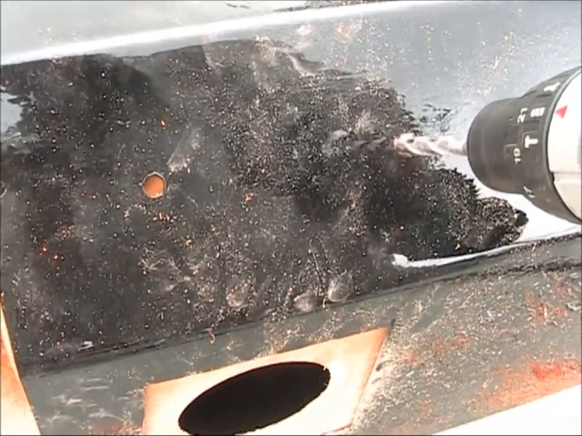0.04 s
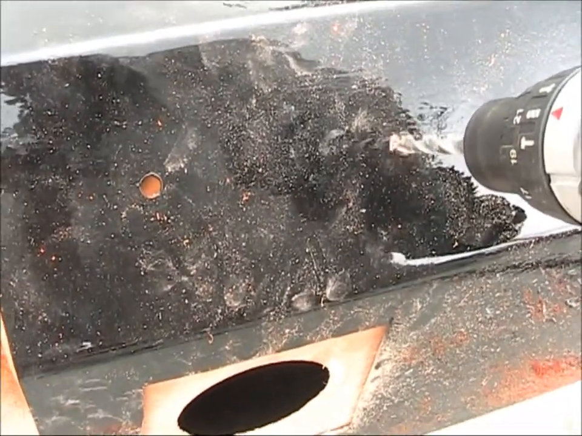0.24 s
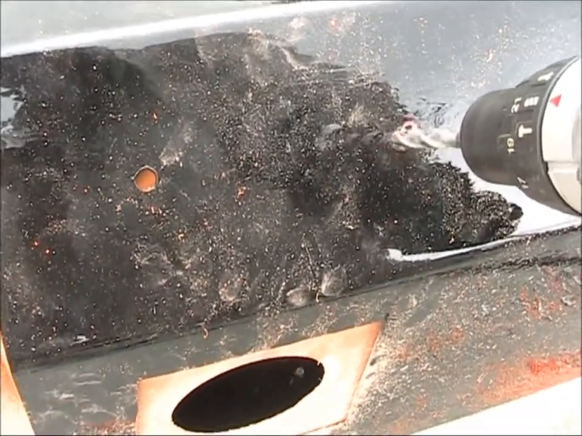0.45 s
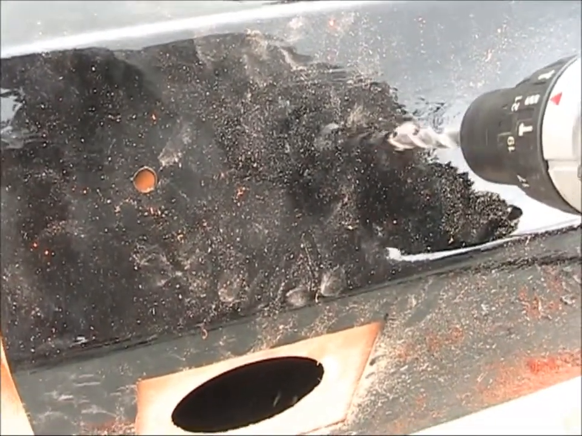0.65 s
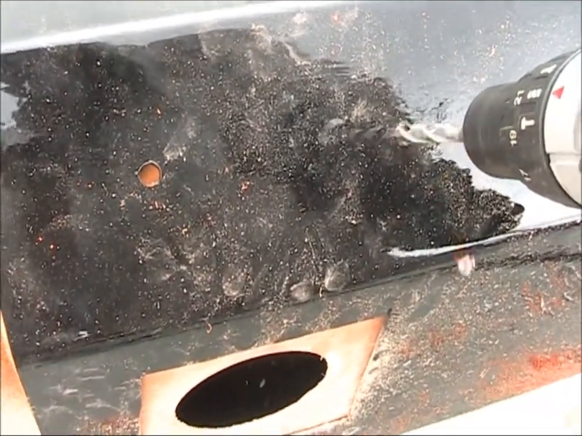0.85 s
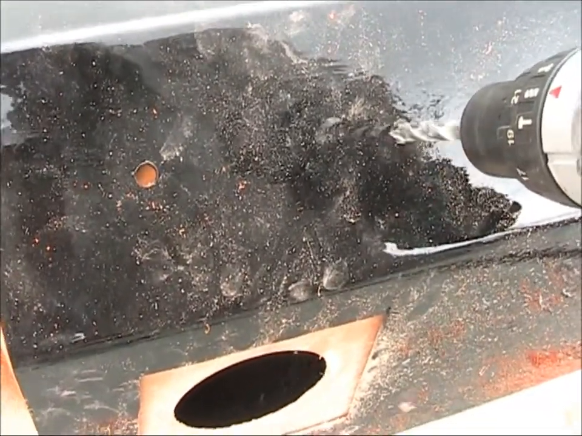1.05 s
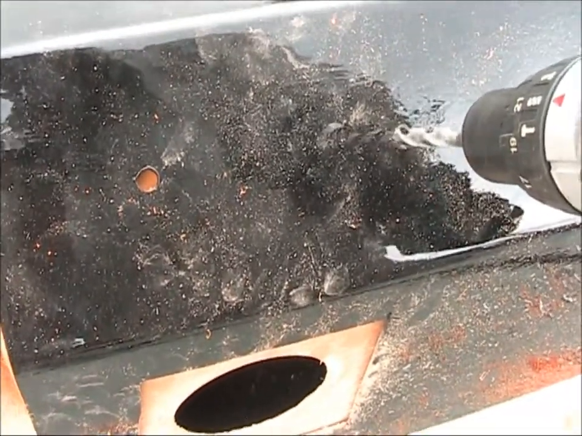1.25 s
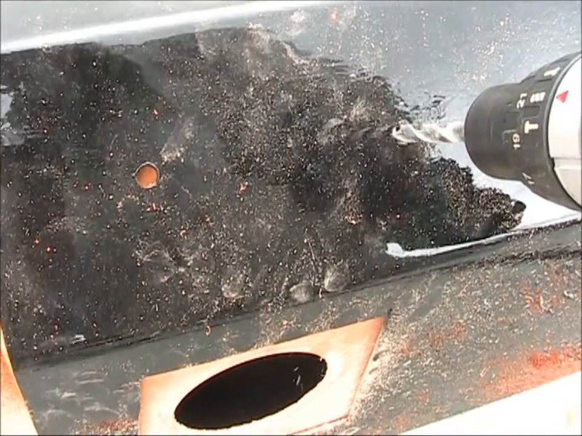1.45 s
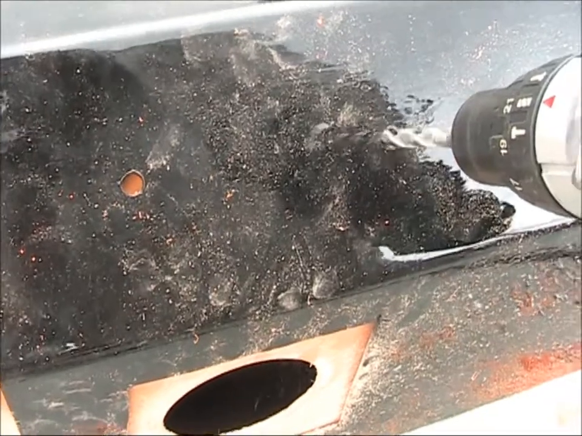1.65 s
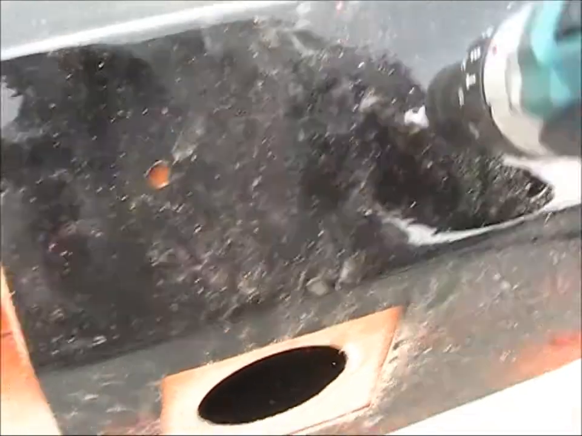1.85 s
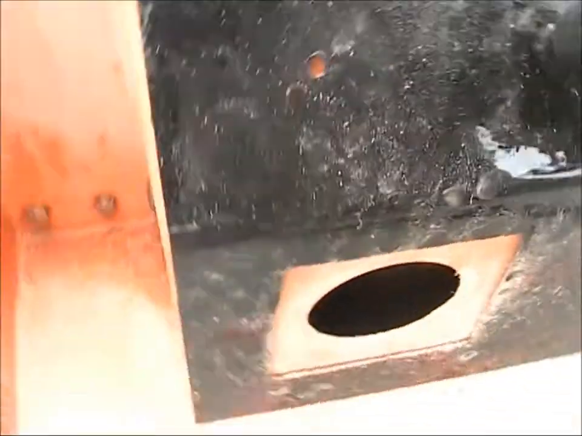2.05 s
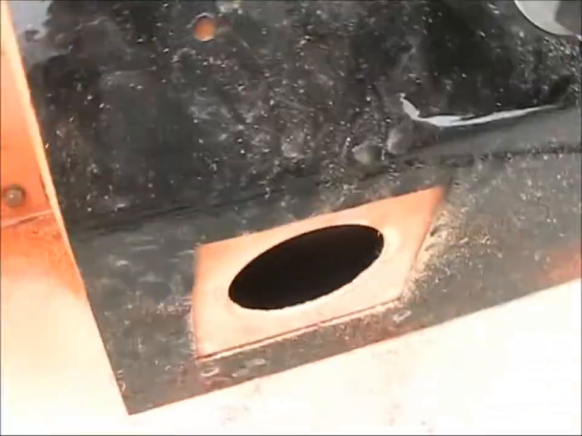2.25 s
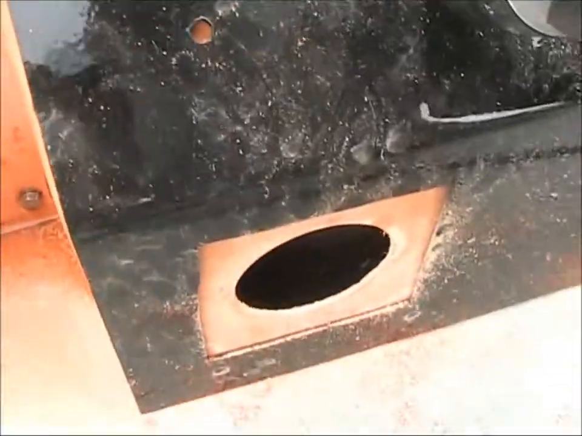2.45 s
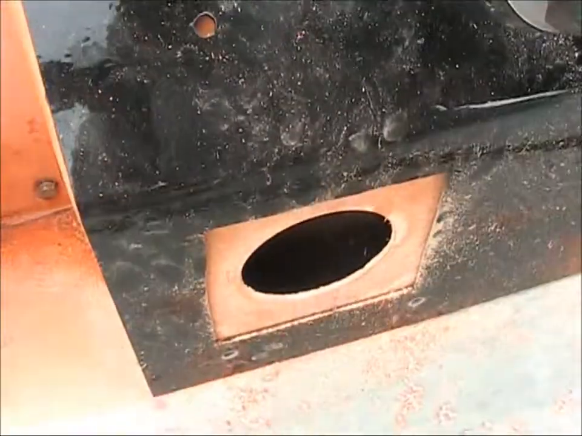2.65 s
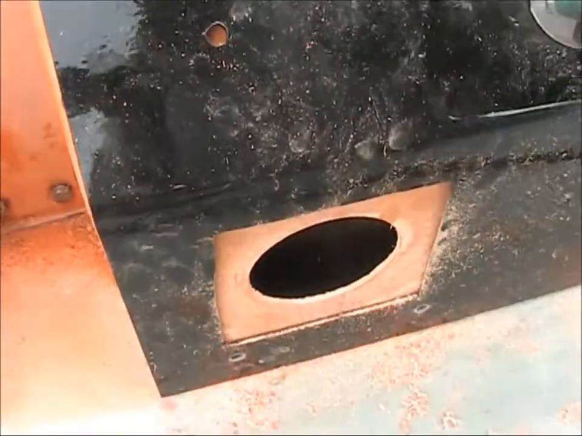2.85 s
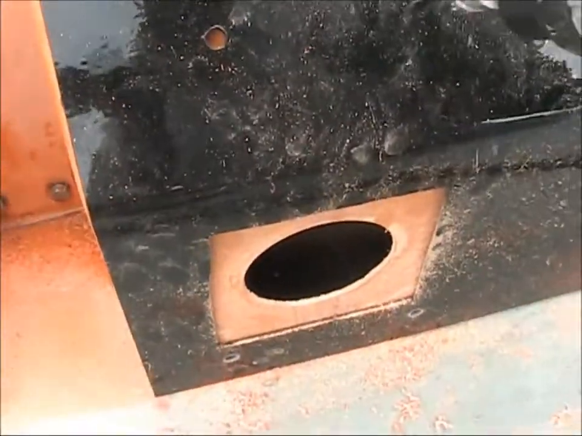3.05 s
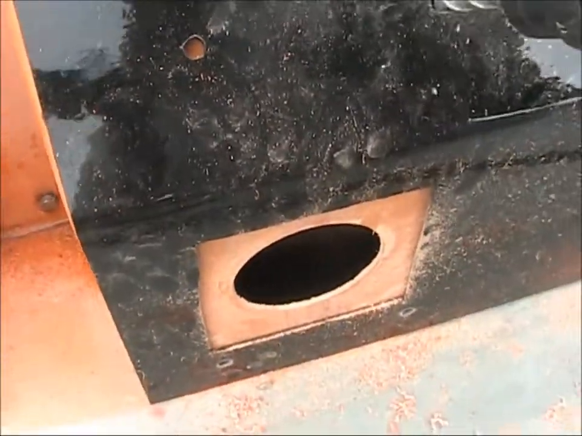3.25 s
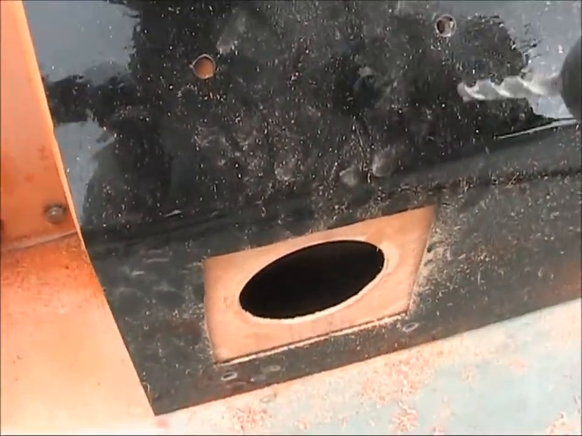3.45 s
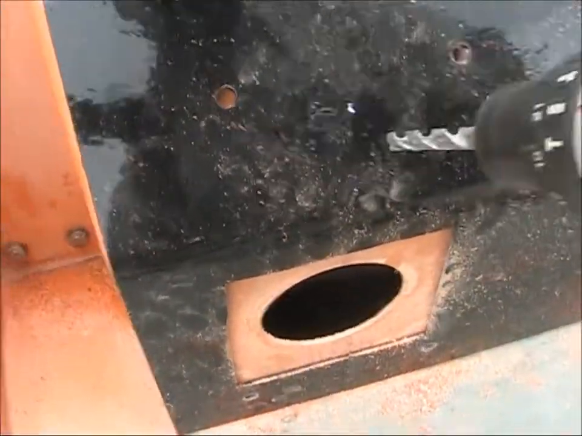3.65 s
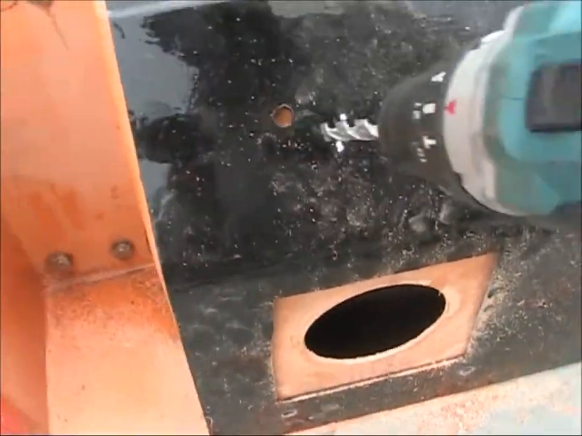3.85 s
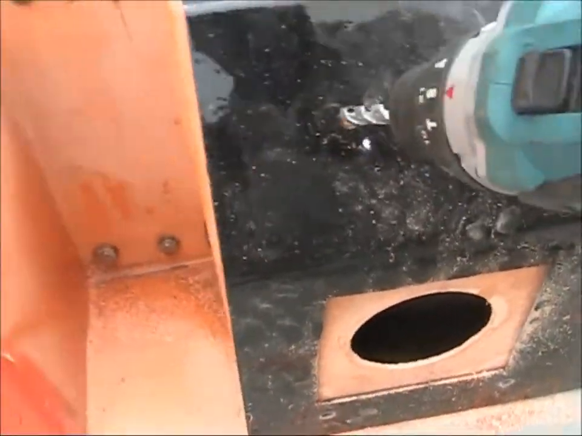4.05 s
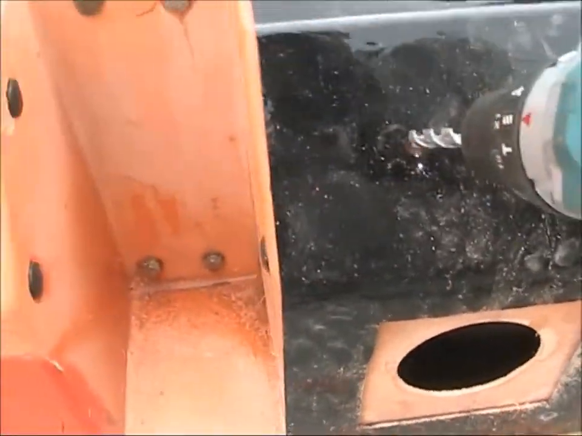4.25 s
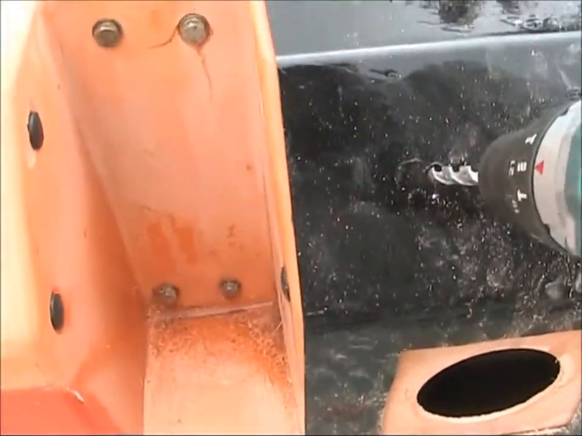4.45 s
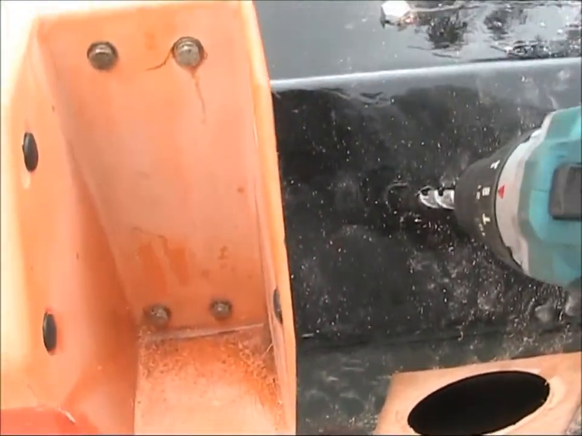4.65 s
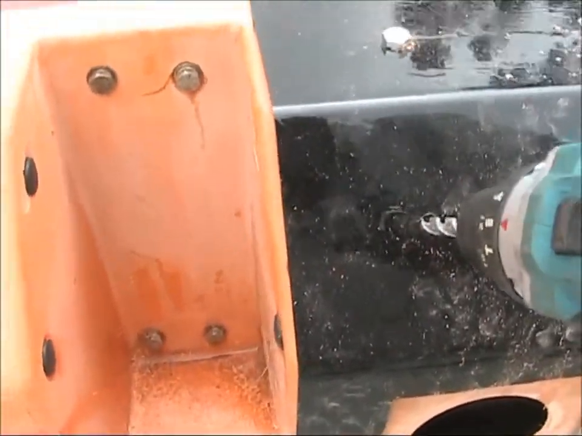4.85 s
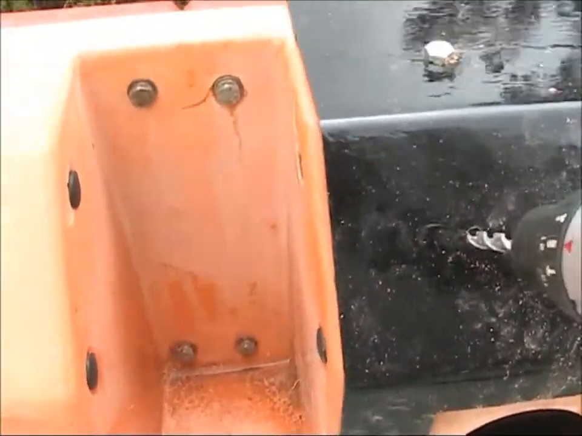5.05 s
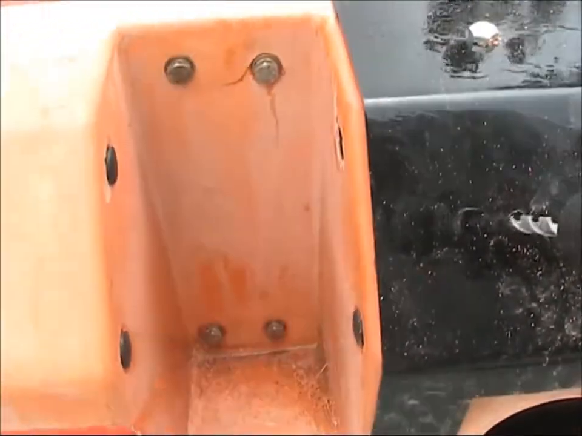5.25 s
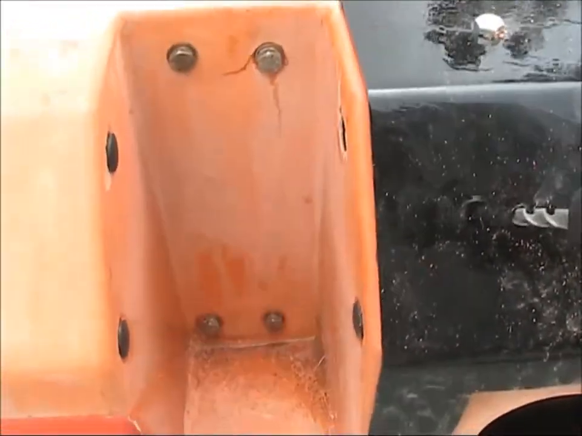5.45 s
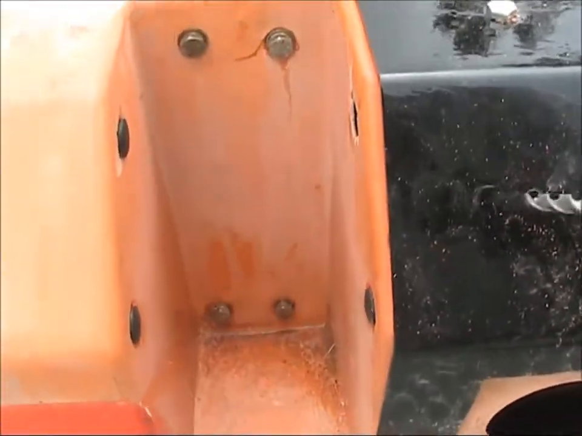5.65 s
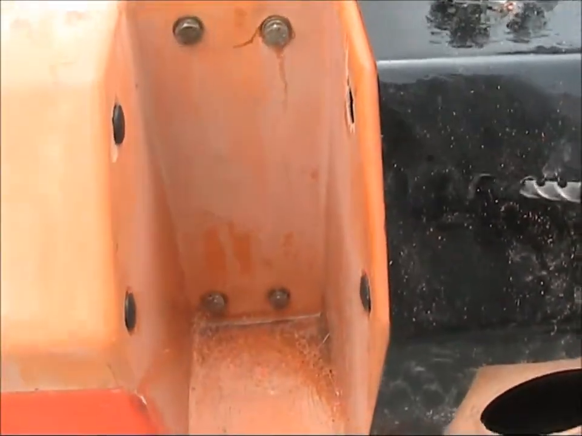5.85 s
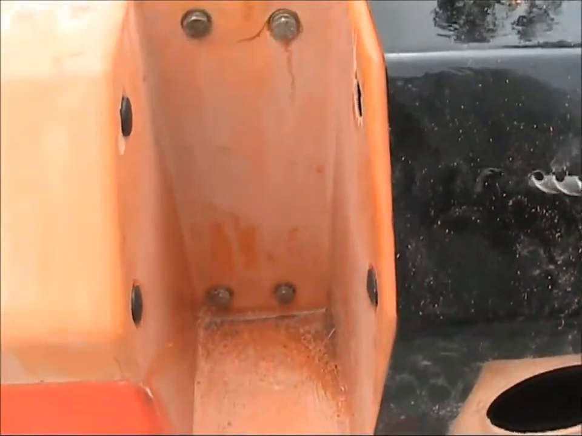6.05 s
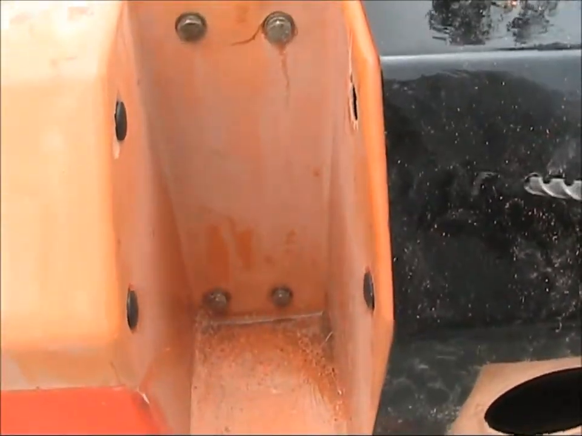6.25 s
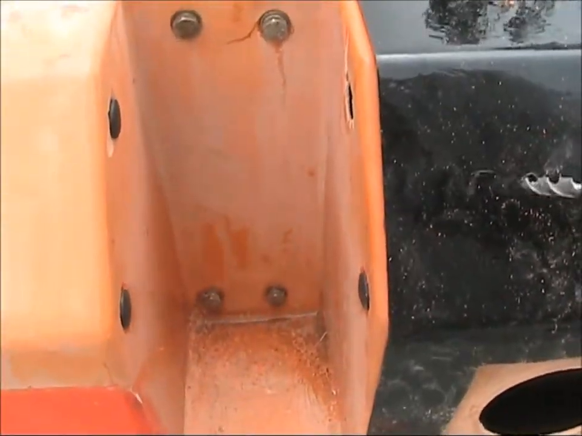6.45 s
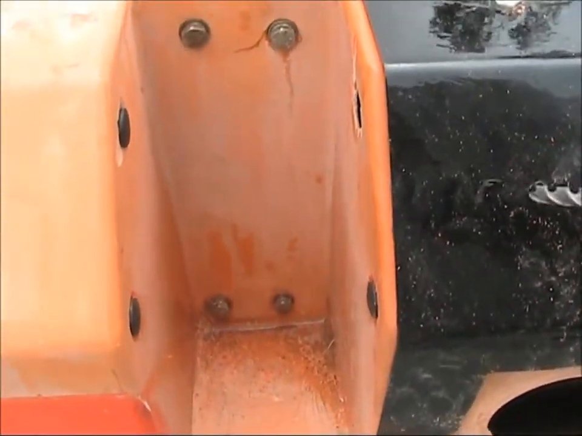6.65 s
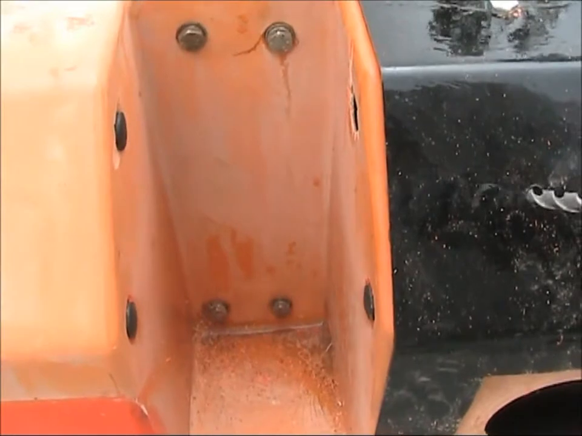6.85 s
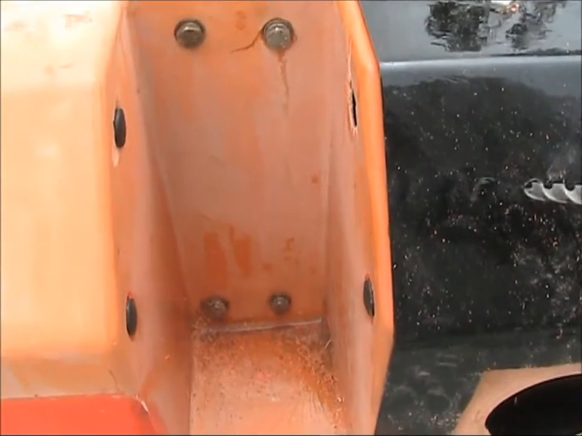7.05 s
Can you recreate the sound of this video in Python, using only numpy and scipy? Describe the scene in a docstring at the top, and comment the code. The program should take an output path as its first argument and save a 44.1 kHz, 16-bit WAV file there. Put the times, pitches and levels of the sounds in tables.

```python
"""Drilling a fibreglass boat panel

A cordless drill bores close to a hand-held camera, stops, is dragged to a new spot and starts again. Sine
rotor orders whine over noisy gear clatter; noise and blows ring the panel's modes as drumming and knocks.
Rough contact bursts make the trigger ticks and ring the dragged drill body. Coloured noise makes the wind
on two microphone ports and a faint outdoor hiss; a wavering sine makes one far chirp."""
import sys
import numpy as np
from scipy import signal
from scipy.fft import rfft, irfft
from scipy.io import wavfile
from scipy.ndimage import uniform_filter1d, map_coordinates

SR = 44100
rng = np.random.default_rng(int(sys.argv[2]) if len(sys.argv) > 2 else 0)


def put_to_file(sound):
    """Save the sound as 16-bit audio at rate SR, in the file named by the first command-line argument."""
    columns = np.atleast_2d(sound).T  # one column per channel
    safe = np.clip(columns, -1, 1)
    whole_steps = np.round(safe * 32767)
    wavfile.write(sys.argv[1], SR, whole_steps.astype(np.int16))


N = 313110
T = np.arange(N) / SR
SWUNG_ASIDE_S, SECOND_HOLE_S = 1.85, 4.4  # the drill is swung aside; settings for the second hole begin
SQUEEZE_S = 5.176  # the rotor starts to turn again
HUM_DB_PER_OCTAVE = 48  # an unbalanced rotor shakes less as it slows

# colour of the gearbox shell: pitch_hz [Hz], level_db [dB per Hz, relative]
SHELL = [(300, -11.5), (600, -14), (1200, -6), (1650, -5.5), (2000, -4.5), (2300, -1.5), (2900, -3.5),
         (4300, 3), (5300, -2), (6500, -2.5), (8500, -0.5), (10000, -3.5), (11500, -5.5), (13000, -12),
         (14500, -12), (15700, -46)]
# panel modes: pitch_hz [Hz], level_db [dB], t60_s [s, before each use shortens it]
PANEL_MODES = [(157, -9, 0.32), (178, -5.5, 0.21), (260, 4.5, 0.071), (362, -1.5, 0.092),
               (550, -9.5, 0.047), (686, -0.5, 0.07), (803, 3, 0.073), (897, -8.5, 0.15),
               (1105, 7.5, 0.044), (1296, 7.5, 0.054), (1400, -3, 0.05), (1684, 6.5, 0.058),
               (2290, 6, 0.04), (3470, -24.5, .03)]
# modes of the drill body dragged on the panel: pitch_hz [Hz], width_hz [Hz], level_db [dB]
BODY_MODES = [(168, 47, 20), (523, 13, -2.5), (670, 35, -5), (790, 37, -11), (926, 19, -11),
              (1054, 10, -5.5), (1132, 18, -10), (1240, 12, -12), (1464, 45, -7), (1717, 44, -9),
              (2004, 50, -22), (3070, 68, -17), (3420, 150, -13), (3890, 53, -9), (4450, 32, -14),
              (4970, 41, -36), (5570, 32, -24), (7900, 30, -24), (8800, 30, -25.5)]


def undb(db):
    """Turn decibels into an amplitude factor."""
    return 10 ** (np.asarray(db) / 20)


def unit(x):
    """Scale to rms 1."""
    return x / np.sqrt(np.mean(x ** 2))


def follow(points):
    """Draw each level or pitch column of a timed table as a curve over the whole scene."""
    s, *columns = np.transpose(points)
    return [np.interp(T, s, column) for column in columns]


def colour(x, points):
    """Shape a spectrum by (Hz, dB) points joined on a log pitch scale; rms 1."""
    hz, db = np.transpose(points)
    f = np.arange(N // 2 + 1) * SR / N + 1  # 1 Hz up keeps the log finite
    gain = undb(np.interp(np.log(f), np.log(hz), db, left=-70))
    return unit(irfft(rfft(x) * gain, N))


def walk(rate):
    """Smooth random wander with rms 1, from noise stepped at this rate (Hz)."""
    k = int(SR / rate)
    steps = np.repeat(rng.standard_normal(N // k + 1), k)
    return unit(uniform_filter1d(uniform_filter1d(steps, k), k)[:N])


def ring(x, hz, t60):
    """One resonant mode driven by x, decaying 60 dB in t60 seconds."""
    pole = np.exp(2j * np.pi * hz / SR - np.log(1000) / (t60 * SR))
    return signal.lfilter([1], [1, -pole], x).imag


def passed(x, order, hz, kind="low"):
    """Butterworth filter."""
    return signal.lfilter(*signal.butter(order, hz, kind, fs=SR), x)


def passed_in_phase(x, order, hz, kind="low"):
    """Butterworth filter run both ways, so that it adds no delay."""
    return signal.sosfiltfilt(signal.butter(order, hz, kind, fs=SR, output="sos"), x)


def add(out, s, sound, peak_db):
    """Mix a sound in at time s with the given peak."""
    i = int(s * SR)
    out[i:i + len(sound)] += (sound * undb(peak_db) / np.abs(sound).max())[:N - i]


def burst(ms, size=12000):
    """Rough contact force dying by 1 / e in this many ms."""
    return rng.standard_normal(size) * np.exp(-np.arange(size) / (ms * SR / 1000))


def near(hz, spot_hz, octaves):
    """A struck spot drives the modes near its pitch most."""
    return np.exp(-.5 * (np.log2(hz / spot_hz) / octaves) ** 2)


def spin():
    """Share of full speed: braked when the trigger is let go, running up when it is pulled."""
    release_s, brake_s, spin_up_s = 3.503, .056, .098  # the brake takes the speed down by 1 / e in brake_s
    braking = np.exp(-np.maximum(T - release_s, 0) / brake_s)
    braking = uniform_filter1d(braking, size=400)
    run_up = np.tanh((T - SQUEEZE_S) / spin_up_s)
    return np.maximum(braking, run_up) + 1e-4


def gear_clatter(angle, strain):
    """Noisy tooth impacts pulse once a turn and take on the colour of the gearbox shell."""
    strained_rattle_db = -1  # teeth pressed together rattle less
    teeth = rng.standard_normal(N) * undb(1.34 * rng.exponential(size=N))
    teeth *= 1 + 0.11 * np.cos(angle)
    wander_db = 0.6 * walk(12) + 1.2 * walk(150)
    return colour(teeth, SHELL) * undb(wander_db + strained_rattle_db * strain)


def rotor_orders(angle, hz, strain, upper_db):
    """Multiples of the rotor speed share one shaft angle and swell as they cross the shell's resonances."""
    full_speed_hz, upper_order = 380, 20  # reference speed; the upper orders start here
    # rotor orders against the clatter: multiple [-], first_hole_db, swung_aside_db, second_hole_db [dB]
    orders = [(2, -18, -18, -20), (3, -26, -28, -29), (4, -25, -25, -36), (6, -30, -33, -30),
              (7, -25, -22, -32), (8, -18, -23, -19), (9, -14, -18, -20), (11, -28, -20, -27),
              (12, -30, -22, -28), (13, -32, -24, -23), (14, -20, -15, -18), (15, -26, -23, -26),
              (16, -25, -21, -25), (17, -30, -23, -28), (18, -32, -22, -21), (19, -23, -22, -22),
              (20, -18, -14, -8), (21, -21, -17, -20), (22, -30, -20, -12), (23, -9, -10, -17),
              (24, -16, -15, -9), (25, -17, -23, -26), (26, -19, -24, -17), (28, -24, -27, -18),
              (29, -21, -24, -17), (30, -11, -20, -12)]
    # orders that sing out off full speed: multiple [-], level_db [dB against the clatter, before the shell]
    strained_orders = [(4.9, -12), (12, -15), (14, -15), (20, -12), (23, -12), (25, -13), (28, -11),
                       (35, -9)]
    shell_hz, shell_db = np.transpose(SHELL)
    octaves = np.log2(hz / full_speed_hz)
    out = np.zeros(N)
    for k, first, aside, second in orders:
        db = np.select([T < SWUNG_ASIDE_S, T < SECOND_HOLE_S], [first, aside], second) + 1.8 * walk(14)
        if k >= upper_order:
            db = db + upper_db
        # slower teeth strike softer; the shaking of the lowest orders dies faster
        db = db + (HUM_DB_PER_OCTAVE / 2 if k < 3 else 2.5) * octaves
        db = db + np.interp(k * hz, shell_hz, shell_db) - np.interp(k * full_speed_hz, shell_hz, shell_db)
        out += undb(db) * np.sqrt(2) * np.sin(k * angle + k * k)
    for k, db in strained_orders:
        level_db = db + 4 * walk(60) + np.interp(k * hz, shell_hz, shell_db)
        out += strain * undb(level_db) * np.sqrt(2) * np.cos(k * angle + k * k)
    return out


def drill(hz, strain, clatter_db, whine_db, hum_db, upper_db):
    """Clatter, orders, pinion whine and rotor hum all turn on one wavering shaft angle."""
    wavering_hz = hz * (1 + 0.00084 * walk(40) + 0.000497 * walk(10))
    angle = 2 * np.pi * np.cumsum(wavering_hz) / SR
    clatter = gear_clatter(angle, strain) + rotor_orders(angle, hz, strain, upper_db)
    whine = undb(whine_db + 0.38 * walk(30)) * np.sin(10 * angle)  # ten teeth on the pinion
    whine *= np.clip((hz - 170) / 130, 0, 1)  # lost at low speed
    hum = undb(hum_db + 0.94 * walk(26)) * np.sin(angle)
    return undb(clatter_db) * clatter + np.sqrt(2) * (whine + hum)


def vents(clatter_db):
    """The vents blow shell-coloured noise, unrelated at the two ports, that follows the clatter level."""
    share = .55  # of the clatter amplitude
    air = np.array([colour(rng.standard_normal(N), SHELL) for _ in range(2)])
    return undb(clatter_db) * share * air


def bites(hz):
    """In the second hole the bit bites once a chuck turn, each bite dying away to a resting level."""
    turns_per_bite, bite_s = 30.4, 5.995  # rotor turns; time of one bite
    rest, fade = .22, .35  # level between bites; share of a chuck turn in which a bite dies by 1 / e
    chuck = np.cumsum(hz) / SR / turns_per_bite
    since = (chuck - chuck[int(bite_s * SR)]) % 1
    return np.where(T > SECOND_HOLE_S, rest + np.exp(-since / fade), 1)


def drumming(drum_db):
    """Noisy chip cutting keeps the panel modes humming, the low ones most."""
    first_hole_boom_db = 4  # the first hole sits where the lowest modes swing widest
    chips = rng.standard_normal(N) * undb(1.2 * walk(30))
    hum = np.zeros(N)
    for hz, db, t60 in PANEL_MODES:
        boom_db = (hz < 200) * (T < SWUNG_ASIDE_S) * first_hole_boom_db
        hum += undb(db + boom_db) * near(hz, 285.0, 2.75) * ring(chips, hz, .5 * t60)
    return undb(drum_db) * unit(hum)


def wind():
    """Gusts of low noise buffet the ports, the left one most, pushing them partly oppositely."""
    # gust level: start_s [s], buffeting_db [dB, before each port's own level]
    gusts = [(0.0, -33), (0.95, -38), (1.36, -46), (1.66, -40), (1.8, -40), (2.16, -45), (2.27, -36),
             (2.37, -51), (2.61, -55), (2.91, -43), (3.16, -50), (3.24, -43), (3.38, -57), (3.62, -66),
             (3.68, -60), (3.75, -49), (3.85, -51), (3.93, -44), (4.21, -34.5), (4.28, -44), (4.39, -36.5),
             (4.43, -41), (4.5, -27), (4.65, -33.5), (4.8, -31), (4.92, -32), (5.12, -39), (5.26, -34),
             (5.63, -46.5), (6.03, -50), (6.19, -50), (6.76, -51), (7.0, -50)]
    # rumble colour: pitch_hz [Hz], level_db [dB per Hz, relative]
    rumble = [(12, -59.5), (20, -3.5), (59, -11.5), (119, -6.5), (313, -24), (404, -59), (468, -35),
              (700, -55), (910, -71), (1540, -120)]
    gust = undb(follow(gusts)[0])
    swell = walk(14)
    shared = rng.standard_normal(N)
    ports = []
    for port_db, mix in ((5.5, 1.12), (-3.0, -0.61)):  # left, right
        push = colour(rng.standard_normal(N) + mix * shared, rumble)
        ports.append(gust * undb(port_db + 1.0 * walk(16) + 1.9 * swell) * push)
    return np.array(ports)


def outdoor_hiss():
    """Faint wide noise, part common to the ports and part their own; it sits low while the drill runs."""
    # hiss level: start_s [s], level_db [dB for the common part]
    levels = [(3.8, -55), (3.95, -45.5), (4.1, -44), (4.38, -44), (4.5, -42), (4.82, -46), (5.12, -50)]
    # hiss colour: pitch_hz [Hz], level_db [dB per Hz, relative]
    hiss_colour = [(250, -10), (400, -4), (700, -9.5), (1300, -15), (1800, -17), (2400, -16), (3200, -22.5),
                   (4500, -20.5), (5600, -25), (8000, -30.5), (12000, -29.5), (15500, -15.5)]
    both, left, right = (colour(rng.standard_normal(N), hiss_colour) for _ in range(3))
    return undb(follow(levels)[0] + 1.2 * walk(8.1)) * (both + .5 * np.array([left, right]))


def blow(ms):
    """One firm impact of 12 samples on top of a rough, dying contact."""
    force = burst(ms)
    force[:12] += np.sqrt(ms) * 0.23
    return force


def knocks():
    """Snags and set-downs ring the panel modes near the struck spot, with the blow itself as a crack."""
    damping = .42  # shortens the rings
    # blows: start_s [s], peak_db [dB], spot_hz [favoured pitch, Hz], contact_ms [1 / e decay, ms],
    # crack_db [dB]
    blows = [(1.805, -13.5, 210, 11, -3), (1.817, -7.5, 1800, 5.4, 15), (1.866, -14.5, 695, 7.1, 18),
             (1.892, -15, 280, 11, 5), (1.893, -6, 2200, 5.2, 30), (1.959, -14, 1291, 78, -10),
             (2.0, -20, 1700, 20, -10), (2.084, -28, 150, 64, -15), (2.233, -12.5, 820, 16, 2),
             (2.235, -6.5, 1500, 9.6, 12), (2.248, -12.5, 149, 20, -12), (2.875, -18, 296, 8.4, 4),
             (2.93, -8.5, 726, 33, 0), (2.95, -18, 1200, 25, 0), (2.977, -12, 800, 18, -1.5),
             (2.985, -18, 275, 45, -5), (3.011, -13.5, 277, 20, -3), (3.088, -14, 1280, 11, 0),
             (4.637, -8, 674, 20, 3), (4.639, -18, 2000, 11, 12), (4.646, -9, 190, 25, -7),
             (5.163, -16.5, 350, 12, -25), (5.167, -16, 660, 19, -25), (5.183, -13.5, 1201, 8, -5),
             (5.218, -11, 680, 22, -3)]
    out = np.zeros(N)
    for s, peak_db, spot_hz, ms, crack_db in blows:
        force = blow(ms)
        body = sum(undb(db) * near(hz, spot_hz, 0.45) * ring(force, hz, damping * t60)
                   for hz, db, t60 in PANEL_MODES)
        add(out, s, body + undb(crack_db) * passed(force, 2, 2800.), peak_db)
    return out


def panel(drum_db):
    """The panel drums and knocks, with no deep bass."""
    return passed(drumming(drum_db) + knocks(), 2, 110., "high")


def trigger_ticks():
    """Trigger and brake tick: a short burst rings two brief modes."""
    # ticks: start_s [s], peak_db [dB, before port gain], pitch_hz [Hz]
    ticks = [(3.5325, -13, 4054), (3.5897, -23.5, 4690), (3.612, -25, 3470), (3.623, -25, 4070),
             (3.704, -47, 4000), (4.977, -42, 3970), (5.137, -26.5, 3060), (5.172, -21.5, 4200)]
    out = np.zeros(N)
    for s, peak_db, hz in ticks:
        force = burst(3.7)
        rings = 0.57 * ring(force, hz, 0.0015) + 0.2 * ring(force, 5900.0, 0.0018)
        add(out, s, rings + passed(force, 2, [1500., 9500.], "band"), peak_db)
    return out


def bird():
    """A faint, rough squeak: one sine with fast random wander in pitch and level."""
    # chirp: start_s [s], pitch_hz [Hz], level_db [dB]
    chirp = [(3.72, 3900, -80), (3.74, 3750, -63), (3.765, 3400, -62), (3.8, 3650, -61), (3.825, 3360, -63),
             (3.84, 3300, -80)]
    hz, db = follow(chirp)
    sounding = (T > chirp[0][0]) * (T < chirp[-1][0])
    angle = 2 * np.pi * np.cumsum(hz * (1 + 0.05 * walk(700))) / SR
    return undb(db + 4.6 * walk(500)) * sounding * np.sin(angle)


def scrape():
    """Gritty noise is heard directly and through the modes of the drill body as it scrapes along."""
    # scraping between the jolts: start_s [s], level_db [dB of the direct grit, before port gain]
    levels = [(4.318, -75), (4.328, -39), (4.37, -56), (4.42, -58), (4.445, -46), (4.5, -43), (4.55, -51),
              (4.6, -65), (4.64, -38), (4.7, -56), (4.8, -75)]
    # grit colour: pitch_hz [Hz], level_db [dB per Hz, relative]
    grit_colour = [(300, -6), (1200, -1), (2200, -2), (4200, -17), (12000, -36)]
    grit = rng.standard_normal(N) * undb(1.8 * rng.exponential(size=N) + 2.5 * walk(90))
    body = unit(sum(undb(db) * np.sqrt(w) * ring(grit, hz, 2.2 / w) for hz, w, db in BODY_MODES[1:11]))
    level_db = np.interp(T, *np.transpose(levels), left=-120, right=-120)
    return undb(level_db) * (colour(grit, grit_colour) + 1.2 * body)


def drags():
    """Short jolts of rough contact ring the drill body, low modes by the spot and bright ones by level."""
    bright_hz = 2500
    # jolts: start_s [s], peak_db [dB, before port gain], spot_hz [favoured pitch, Hz],
    # decay_ms [1 / e, ms], bright_db [level of the rings above bright_hz, dB]
    jolts = [(4.326, -22.5, 990, 16, -10), (4.342, -20.5, 175, 36, -30), (4.352, -26.5, 600, 39, -27),
             (4.434, -25.5, 1140, 23, -12), (4.453, -23, 1020, 17, -17), (4.463, -19.5, 175, 7.7, -30),
             (4.489, -35, 3020, 25, -6), (4.524, -25, 1670, 25, -7.5), (4.528, -24, 160, 11, -30),
             (4.578, -33.5, 1560, 82, -0.5)]
    out = np.zeros(N)
    for s, peak_db, spot_hz, ms, bright_db in jolts:
        force = burst(ms) + 0.69 * burst(3.3)
        force *= np.minimum(np.arange(12000) / 200.0, 1)  # soft onset
        body = 0
        for hz, w, db in BODY_MODES:
            drive = undb(bright_db) if hz > bright_hz else near(hz, spot_hz, 0.68)
            body = body + undb(db) * np.sqrt(w) * drive * ring(force, hz, 1.9 / w)
        add(out, s, body + 6 * passed(force, 1, 3500.), peak_db)
    return out


def scene():
    """Drill, panel and bird reach the left port a little late; wind, hiss and vents differ at the ports."""
    # the drill under load: start_s [s], clatter_db, whine_db, hum_db, drum_db, upper_db [dB],
    # for gear clatter, pinion whine, rotor hum, panel drumming and upper orders, before slowing softens them
    boring = [(0, -18.5, -25, -38.5, -30.5, 2), (.45, -17.5, -25.5, -38.5, -33.5, -0.5),
              (.9, -18, -25.5, -37, -32, 0), (1.451, -18, -25.5, -37, -32.5, 0),
              (1.739, -17.5, -22.5, -35, -28, 1), (1.85, -18.5, -28.5, -44, -22.5, -9),
              (1.98, -21.5, -28, -34.5, -24.5, 2), (2.048, -20, -26.5, -31.5, -27.5, -3),
              (2.32, -18, -26, -32, -30.5, -2), (2.5, -18, -27, -30, -30.5, -5),
              (2.599, -18, -31, -29, -30.5, 4), (2.72, -17.5, -24, -29.5, -30, 3),
              (3.0, -19.5, -24.5, -37, -25, 1), (3.2, -18, -25, -35.5, -27, -3),
              (3.3, -18.5, -25.5, -35.5, -28, 3), (3.44, -18.5, -22, -33, -52, 1),
              (3.5, -18, -21.5, -33, -57, 0), (5.22, -11.5, -10, -40, -14, -13),
              (5.27, -17, -23, -33, -28.5, 3.5), (5.7, -20, -22.5, -41, -35, 2),
              (5.999, -18.5, -24, -40.5, -27, 0.5), (6.3, -19.5, -23, -40.5, -25.5, 2),
              (6.65, -19.5, -22.5, -39.5, -27.5, 1), (7.1, -19, -25.5, -45, -24, 0)]
    # rotor speed under power: start_s [s], turns_hz [turns per second, before braking and run-up]
    speed = [(0, 378), (.12, 377.3), (.62, 377), (.73, 378.3), (.84, 376.6), (1.0, 379.6), (1.2, 378.3),
             (1.42, 381.6), (1.57, 378), (1.76, 376.3), (1.83, 370), (1.97, 377), (2.05, 366.5),
             (2.31, 376.3), (2.52, 377.5), (2.62, 381.5), (2.72, 383.6), (2.9, 381), (3.1, 379.5),
             (3.21, 379.5), (3.3, 383), (3.43, 388.5), (3.5, 377), (5.22, 384), (5.45, 382), (5.68, 385),
             (6.09, 382.1), (6.2, 382.6), (6.61, 380.5), (7.1, 382.4)]
    # arrival at the left port after the right: start_s [s], late_s [s]
    lag = [(1.7, 33e-6), (1.9, 27e-6), (3.3, 26e-6), (5.2, 36e-6)]
    left_treble_db, handling_left_db = -1.3, 2.5
    driven_db_per_octave = 6  # driven gears stay loud at low speed
    quiet_share, quiet_db_per_octave = 0.79, 12  # below this share of full speed the gears die away
    strain_share = .12  # this far under full speed the strained orders are at full strength

    clatter_db, whine_db, hum_db, drum_db, upper_db = follow(boring)
    share = spin()
    hz = uniform_filter1d(follow(speed)[0], size=900) * share
    slope = np.where(T > SQUEEZE_S, driven_db_per_octave, quiet_db_per_octave)
    slow_db = slope * np.minimum(np.log2(share / quiet_share), 0)
    clatter_db = clatter_db + slow_db
    hum_db = hum_db + HUM_DB_PER_OCTAVE * np.log2(share)
    strain = np.clip((1 - share) / strain_share, 0, 1)
    tool = drill(hz, strain, clatter_db, whine_db + slow_db, hum_db, upper_db)
    drum_db = drum_db + .5 * slow_db + 20 * np.log10(bites(hz) + 1e-4)
    right = tool + panel(drum_db) + bird()
    left = map_coordinates(right, [np.arange(N) - follow(lag)[0] * SR], order=5)
    left = left + (undb(left_treble_db) - 1) * passed_in_phase(left, 1, 900., "high")  # shaded treble
    handling = (trigger_ticks() + scrape() + drags()) * undb([[handling_left_db], [0]])
    return np.array([left, right]) + handling + vents(clatter_db) + wind() + outdoor_hiss()


def record(dry):
    """The camera widens the bass of its close-set ports, rounds peaks and cuts both ends."""
    # level of the common part above about 11 kHz, higher from about 2 to 3 s: start_s [s], level_db [dB]
    common_treble = [(0, -19), (1.7, -12), (2.0, -3.5), (2.6, -4.5), (3.4, -10.5), (5.1, -19), (5.3, -9)]
    top_hz = 15500
    mid, side = (dry[0] + dry[1]) / 2, (dry[0] - dry[1]) / 2
    side = side + 0.79 * passed(side, 1, 300.)
    # above about 11 kHz the part common to both channels is turned down, so the treble sounds wide
    low = passed_in_phase(mid, 6, 10800.)
    mid = low + undb(follow(common_treble)[0]) * (mid - low)
    wide = passed(np.array([mid + side, mid - side]), 2, 45., "high")
    rounded = np.tanh(1.1 * wide) / 1.05
    return signal.sosfilt(signal.ellip(10, .2, 75, top_hz, fs=SR, output="sos"), rounded)


dry = scene()
out = record(dry)
put_to_file(out)
```